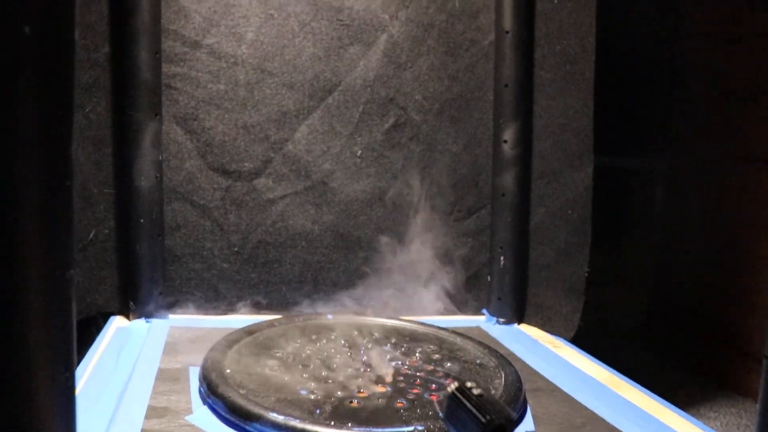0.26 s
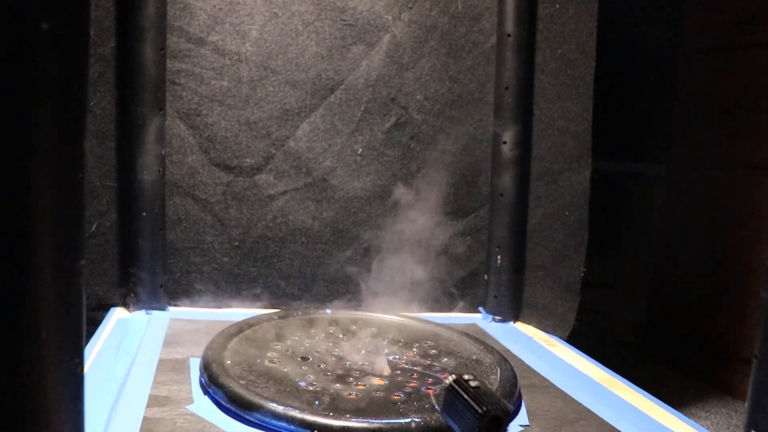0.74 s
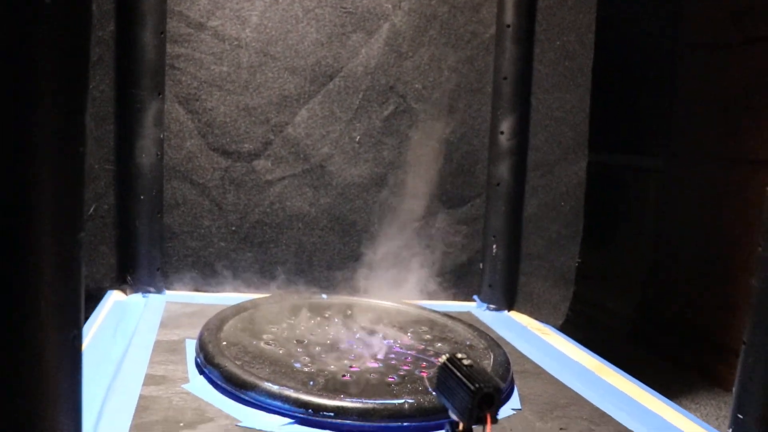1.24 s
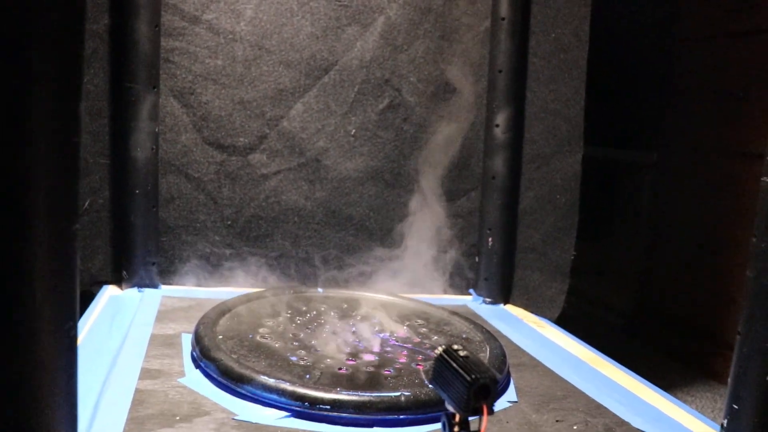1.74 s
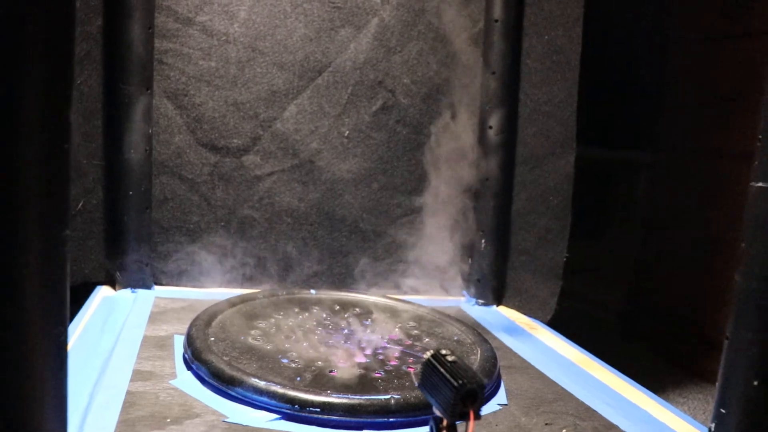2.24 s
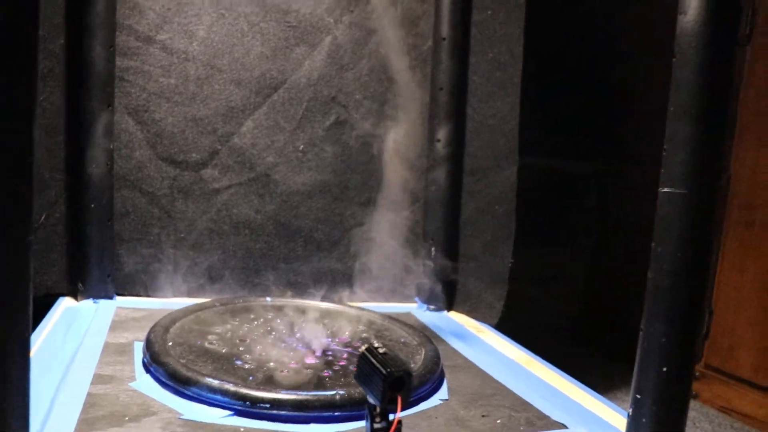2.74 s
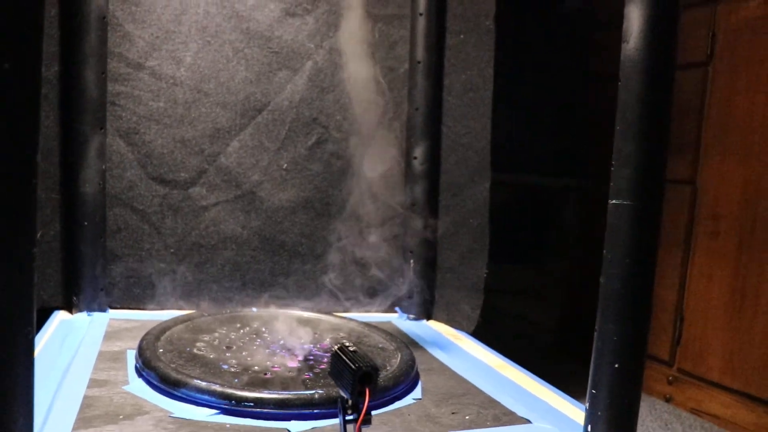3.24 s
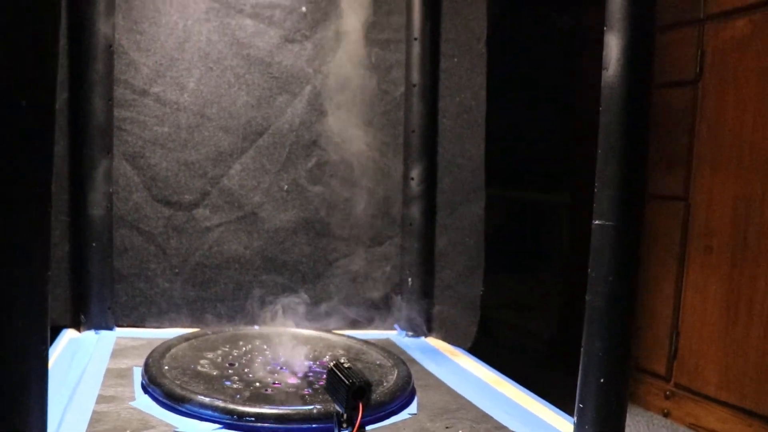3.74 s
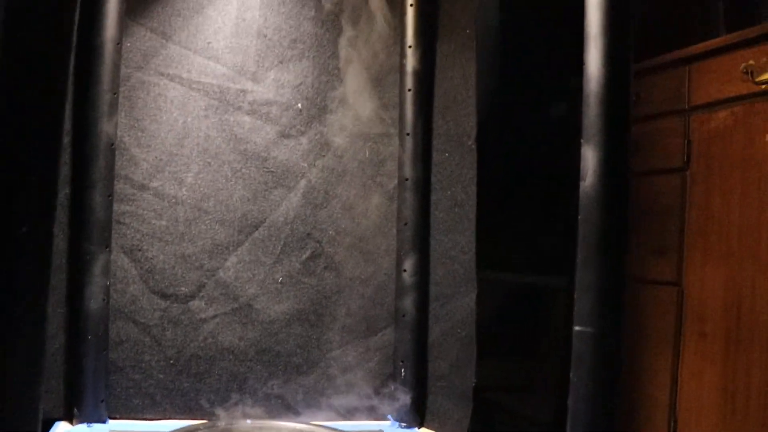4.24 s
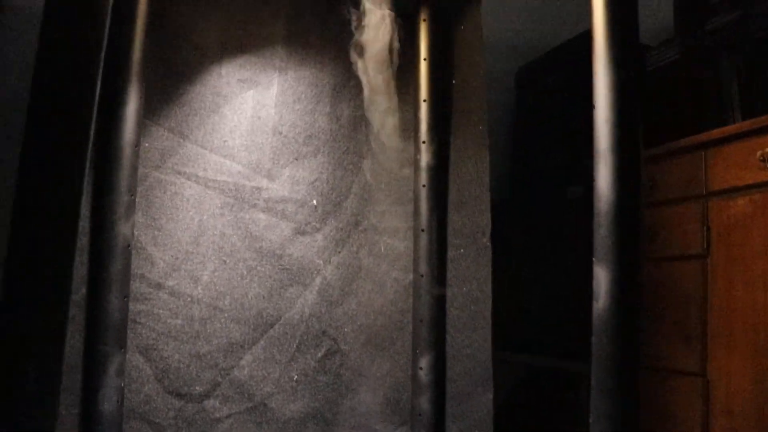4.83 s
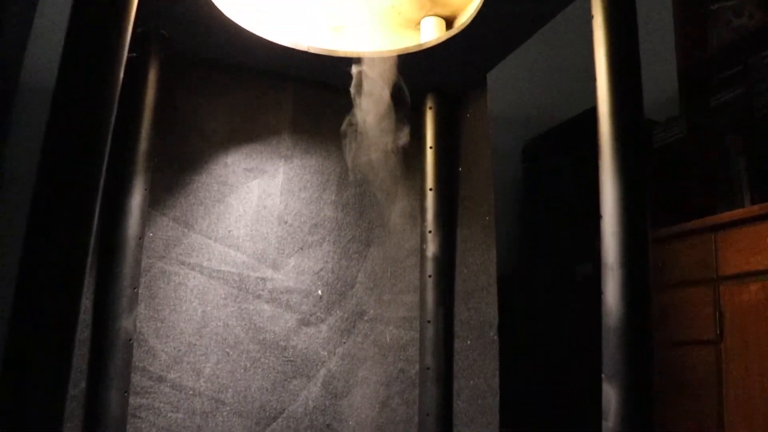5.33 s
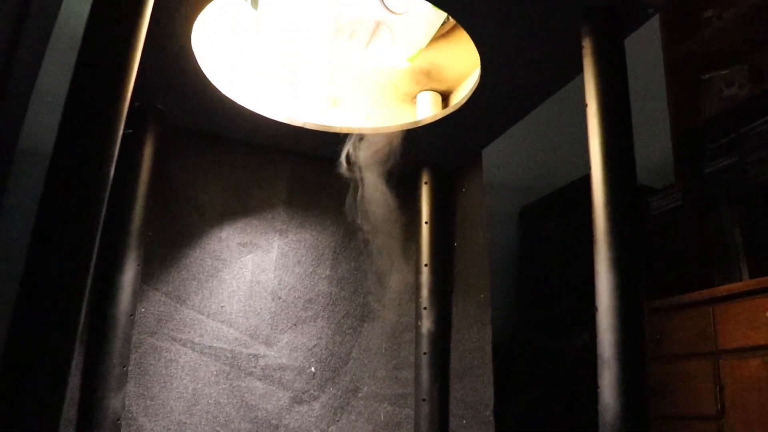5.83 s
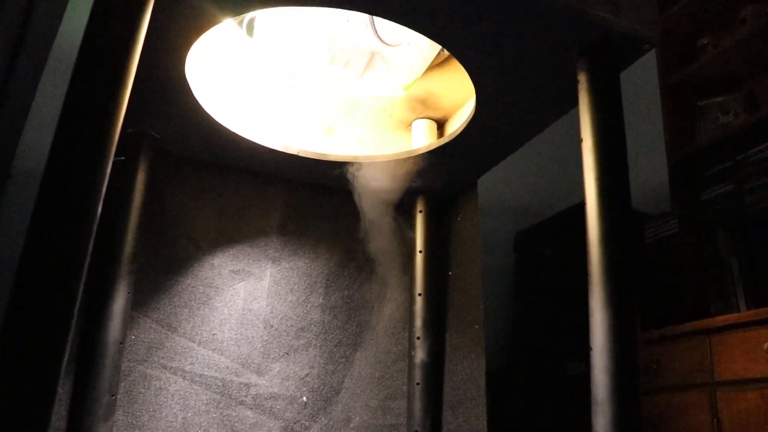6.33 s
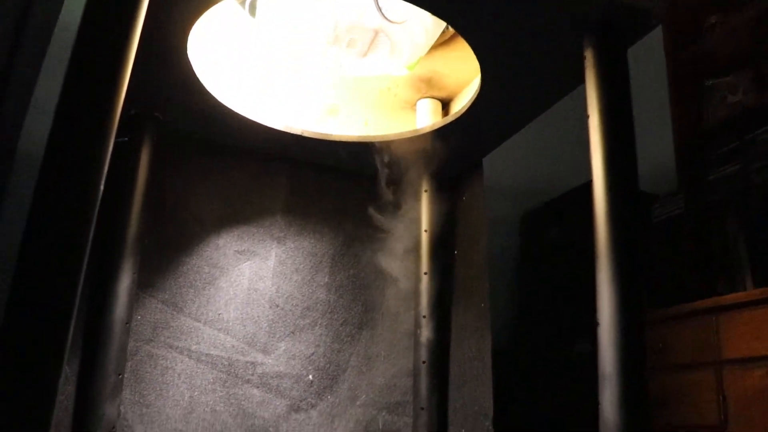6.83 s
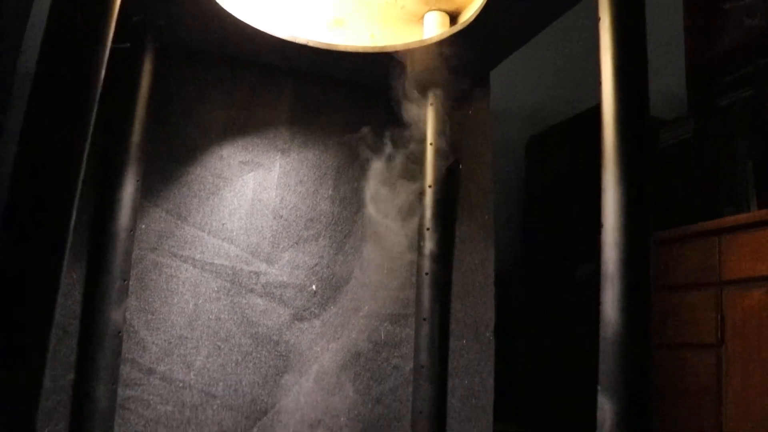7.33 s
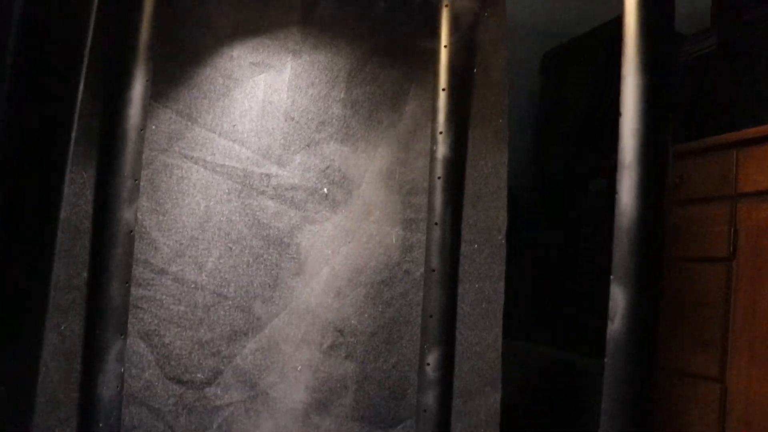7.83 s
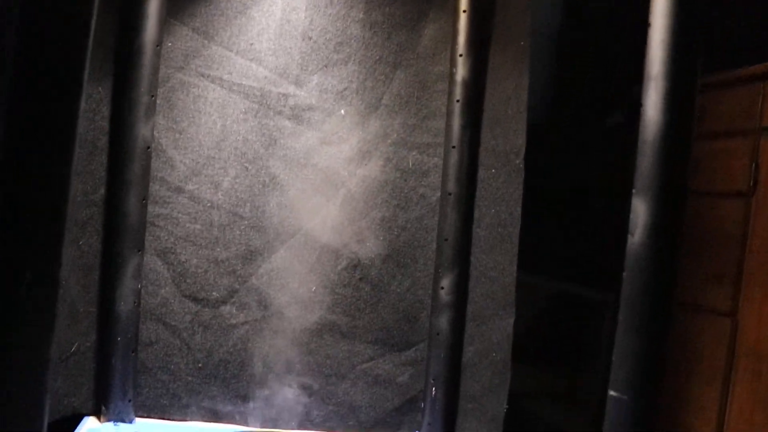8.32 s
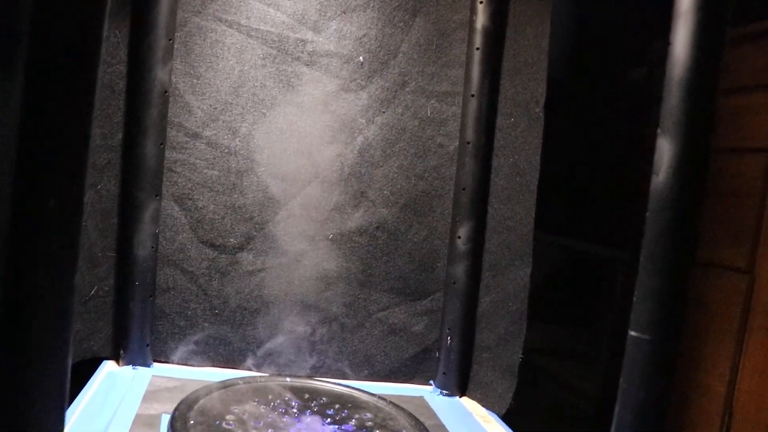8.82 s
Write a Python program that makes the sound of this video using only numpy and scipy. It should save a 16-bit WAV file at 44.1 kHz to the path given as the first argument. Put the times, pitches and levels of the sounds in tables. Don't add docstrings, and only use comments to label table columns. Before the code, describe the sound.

Rushing duct air and motor whine end with a hard plastic click, leaving sparse wet plops, fine spatter and low hum in a small booth.

```python
import sys
import numpy as np
from scipy import signal
from scipy.fft import rfft, irfft
from scipy.io import wavfile
from scipy.ndimage import map_coordinates

SR = 44100
rng = np.random.default_rng(int(sys.argv[2]) if len(sys.argv) > 2 else 0)


def amplitude_ratio(level_db):
    exponent = np.asarray(level_db, float) / 20
    return 10 ** exponent


def generate_wav(signal):
    frames = np.transpose(np.atleast_2d(signal))
    scaled = np.clip(frames, -1, 1) * 32767
    pcm = np.round(scaled).astype(np.int16)
    wavfile.write(sys.argv[1], SR, pcm)


N = 399987
TIME_S = np.arange(N) / SR
BINS_HZ = np.maximum(np.fft.rfftfreq(N, 1 / SR), 1)
SWITCH_OFF_S = 1.95
BASIN_HZ, BASIN_WIDTH_HZ = 597, 20

# start_s, level_db
ROTOR = [
    (0, -31),
    (.12, -30),
    (1.97, -30),
    (2.55, -36),
    (3.4, -42.5),
    (4.3, -48.5),
    (5.2, -55.5),
    (9.07, -56),
]
# start_s, share_0_to_1
AWAY = [
    (0, 0.1),
    (1.0, 0.04),
    (4.0, 0.23),
    (4.45, 0.3),
    (4.9, 0.97),
    (7.5, 0.58),
    (8.5, 0.2),
    (9.07, 0.1),
]


def rms_one(x):
    return x / np.sqrt(np.mean(x ** 2) + 1e-20)


def in_time(rows):
    s, *columns = np.transpose(rows)
    return [np.interp(TIME_S, s, c) for c in columns]


def at_hz(points, hz):
    return np.interp(np.log(hz), np.log(np.array(points)[:, 0]), np.array(points)[:, 1])


def drift(per_s):
    knots = rng.standard_normal(400)
    return map_coordinates(knots, [TIME_S * np.clip(per_s, .1, 40)], order=3)


def colored_noise(spectrum, modes=()):
    level_db = at_hz(spectrum, BINS_HZ)
    for hz, width, boost_db in modes:
        level_db = level_db + boost_db / (1 + (2 * (BINS_HZ - hz) / width) ** 2)
    return rms_one(irfft(rfft(rng.standard_normal(N)) * amplitude_ratio(level_db), N))


def tone(hz, level_db, waver_db):
    level = np.sqrt(2) * amplitude_ratio(level_db + waver_db * drift(2.34))
    return level * np.sin(2 * np.pi * (hz * TIME_S + rng.random()))


def add(out, s, sound):
    i = min(round(s * SR), N)
    out[i:i + len(sound)] += sound[:N - i]


def resonance(x, hz, width):
    r = np.exp(-np.pi * width / SR)
    feedback = [1, -2 * r * np.cos(2 * np.pi * hz / SR), r * r]
    return signal.lfilter(np.array([1, 0, -1]) * (1 - r * r) / 2, feedback, x)


def double_resonance(x, hz, width):
    return resonance(resonance(x, hz, width), hz, 2 * width)


def splat(noise, t, hz, spread, lasts):
    burst = double_resonance(noise * np.exp(-t / lasts), hz, spread * hz)
    return burst / np.abs(burst).max()


def rotor_change_db():
    air_db, = in_time(ROTOR)
    return air_db - ROTOR[0][1]


def coasting_s():
    return np.maximum(TIME_S - SWITCH_OFF_S, 0)


def fan(patchy_db):
    # pitch_hz, level_db (per Hz)
    fan_air = [(35, -28), (60, -6.5), (101, -18.5), (148, -10.5), (266, -4), (335, 1.5), (542, -8),
               (602, -7.5), (825, -9.5), (1110, -14), (2300, -20), (2560, -17), (3430, -18), (7000, -39.5),
               (9000, -45.5), (11700, -49), (19800, -120)]
    # pitch_hz, width_hz, boost_db
    duct = [(76, 37, -6.5), (240.5, 41, 4), (281, 52, 5), (346, 28, -9), (429, 30, 4), (577, 75, -3.5),
            (624, 74, 2), (846, 24, -8.5), (918, 58, -1), (971, 42, 4.5), (3570, 930, 2.5), (5680, 1240, 5)]
    # pitch_hz, loss_db (per dB of rotor level)
    fade_rate = [(100, 0.05), (250, 1.2), (350, 1.07), (500, 1.02), (1000, 1.35), (3000, 1.5), (7000, 2)]
    change_db = rotor_change_db()
    bins, out = rfft(colored_noise(fan_air, duct)), 0
    for hz in 62.5 * 2 ** np.arange(0, 8, .5):
        band = np.cos(np.pi / 2 * np.clip(2 * np.log2(BINS_HZ / hz), -1, 1)) ** 2
        gain_db = 0.5 + ROTOR[0][1] + at_hz(fade_rate, hz) * change_db + patchy_db * drift(7.0)
        out = out + amplitude_ratio(gain_db) * irfft(bins * band, N)
    return out


def pipe():
    change_db = rotor_change_db()
    damping_db = -7.5 * np.exp(-coasting_s() / .3)
    stall_db = 2 * np.minimum(change_db + 23, 0)
    sung = double_resonance(rng.standard_normal(N), 251, 11)
    return amplitude_ratio(-35 + damping_db + stall_db + .9 * change_db) * rms_one(sung)


def motor():
    motor_hz = [340.9, 600.3, 828.2, 948.2, 1200.5]
    motor_db = [-39, -49, -46.5, -50.5, -60]
    current = np.exp(-coasting_s() / 0.043)
    return current * sum(tone(hz, db, waver_db=.6) for hz, db in zip(motor_hz, motor_db))


def blades():
    coast = coasting_s()
    turns = np.cumsum(97.2 * np.exp(-.42 * coast)) / SR
    return np.sqrt(2) * amplitude_ratio(-48 - 9 * coast) * np.sin(2 * np.pi * turns)


def cogging():
    cog_teeth = [6, 7, 8]
    # pitch_hz, width_hz, level_db (rms on top)
    housing = [(735, 110, -60), (935, 100, -59)]
    coast = coasting_s()
    turns = np.cumsum(174 * np.exp(-.31 * coast)) / SR
    lines = sum(amplitude_ratio(4.1 * drift(9)) * np.sin(2 * np.pi * k * turns) for k in cog_teeth)
    lines = np.sqrt(2) * amplitude_ratio(-2.2 * coast) * lines
    return sum(amplitude_ratio(db) * double_resonance(lines, hz, width) for hz, width, db in housing)


def hum():
    mains_odd_db = [-50.5, -62, -63.5, -68, -71, -73, -74, -75, -77, -78, -77]
    appliance_multiples = [1, 3, 7]
    appliance_db = [-52, -53.5, -66]
    mains_hz, appliance_hz = 60.02, 39.53
    throb_period_s, throb_top_s = 2.62, 2.8
    throb = amplitude_ratio(3.8 * np.cos(2 * np.pi * (TIME_S - throb_top_s) / throb_period_s))
    lowest, *upper = [tone((2 * k + 1) * mains_hz, db, waver_db=.7) for k, db in enumerate(mains_odd_db)]
    appliance = sum(tone(k * appliance_hz, db, waver_db=.9)
                    for k, db in zip(appliance_multiples, appliance_db))
    return throb * lowest + sum(upper) + appliance


def murmur():
    # pitch_hz, level_db (per Hz)
    rumble = [(16, -42), (28, 4.5), (48, -9.5), (124, -8.5), (221, -10.5), (293, -11), (354, -11.5),
              (427, -11.5), (478, -11.5), (588, -6.5), (723, -15), (840, -24), (2500, -29.5), (3250, -67),
              (5500, -120)]
    # pitch_hz, width_hz, boost_db
    room_modes = [(58, 7.8, -8), (121, 30, 4.5), (430, 37, 6.5), (550, 43, 1.5), (720, 51, 6.5),
                  (262, 18, -16)]
    return amplitude_ratio(-49.5 + .6 * drift(8)) * colored_noise(rumble, room_modes)


def hiss():
    # pitch_hz, level_db (per Hz)
    hiss_color = [(530, -34), (900, -1.5), (1440, -9), (3620, -7.5), (4490, -11.5), (5240, -9),
                  (6990, -12.5), (15100, -15), (15800, -15.5)]
    return amplitude_ratio(-53 + 0.15 * rotor_change_db()) * colored_noise(hiss_color)


def port_hiss():
    color = [(100, 5.5), (600, 1), (2000, -2.5), (3500, -2.5), (6000, 0.5), (14000, -1.0)]
    return amplitude_ratio(-71.5) * colored_noise(color)


def spray():
    # pitch_hz, width_hz, boost_db
    spray_modes = [(9430, 400, 10), (11340, 600, 9), (12400, 300, 5)]
    away, = in_time(AWAY)
    mist = colored_noise([(6000, -40), (9000, -5), (13000, -1), (16000, -38)], spray_modes)
    return amplitude_ratio(-63.5 - 18.5 * away) * mist


def fizz(per_s, level_db):
    strength = amplitude_ratio(3.3 * np.minimum(rng.exponential(1, N), 1.6))
    bursts = strength * rng.choice([-1, 1], N) * (rng.random(N) < per_s / SR)
    dealt = rng.integers(0, 14, N)
    pitches = np.geomspace(1500, 6000, 14)
    return amplitude_ratio(level_db) * sum(hz ** -.5 * resonance(bursts * (dealt == k) + 1e-18, hz, 0.055 * hz)
                               for k, hz in enumerate(pitches))


def gulps():
    # start_s, peak_db
    air_gulps = [(3.999, -39), (4.305, -40), (5.097, -37), (5.398, -39), (5.488, -37), (5.585, -36),
                 (5.748, -46), (6.04, -48), (6.361, -38), (6.565, -34), (6.715, -35.5), (7.014, -33),
                 (7.069, -50), (7.556, -32), (7.794, -34), (8.154, -34), (8.288, -33), (8.445, -32),
                 (8.594, -38), (8.763, -49)]
    away, = in_time(AWAY)
    note = double_resonance(rng.standard_normal(N), BASIN_HZ, BASIN_WIDTH_HZ)
    out, t = amplitude_ratio(-65 + 12.5 * away) * rms_one(note), np.arange(3000) / SR
    for s, peak_db in air_gulps:
        push = rng.standard_normal(len(t)) * np.exp(-t / 0.005)
        boom = resonance(resonance(push, BASIN_HZ, 160), BASIN_HZ, BASIN_WIDTH_HZ)
        add(out, s, amplitude_ratio(peak_db - 8.5) * boom / np.abs(boom).max())
    return out


def hand_wobble():
    # pitch_hz, level_db (per Hz)
    shaking = [(3, -45), (7, -20), (12, 0), (17, -6), (24, -21), (34, -40)]
    # start_s, peak_db
    hand_jolts = [
        (.3, -39),
        (.6, -40.5),
        (2.53, -34.5),
        (2.9, -35),
        (4.32, -42.5),
        (5.9, -36),
        (6.58, -40.5),
        (7.48, -43),
    ]
    rise_db_per_s, fall_db_per_s, still_db = 54, 23.5, -49
    jolts = [db - np.maximum(rise_db_per_s * (s - TIME_S), fall_db_per_s * (TIME_S - s))
             for s, db in hand_jolts]
    level_db = np.maximum(np.max(jolts, axis=0), still_db)
    return amplitude_ratio(level_db) * colored_noise(shaking + [(60, -87.0)])


def lid(uneven_db, splat_db):
    # start_s, peak_db, brightness_db_per_octave
    taps = [(.3478, -49, 18), (0.736, -30.5, -5.5), (1.286, -35.5, -30), (1.8291, -37, -30),
            (2.4681, -42, -20), (2.7282, -27.5, -15), (2.742, -40, 3), (3.8873, -46, -25),
            (4.1032, -42.5, 12), (4.2474, -42, 0), (4.3232, -31, -24), (4.7643, -43, -30),
            (5.809, -48, -25), (8.0552, -41, -20), (8.4445, -42, 5), (8.5176, -42.5, -20)]
    # pitch_hz, level_db, t60_s
    lid_modes = [(7500, -18, .008), (9440, 1, 0.0071), (10600, -4, 0.0067), (11300, -4, .009),
                 (12500, -7, 0.009), (13100, -7, .01)]
    main_hz = lid_modes[1][0]
    out, t = np.zeros(N), np.arange(900) / SR
    for s, peak_db, tilt_db in taps:
        noise, ring = rng.standard_normal(len(t)), 0
        for k, (hz, db, t60) in enumerate(lid_modes):
            bright_db = tilt_db * max(np.log2(hz / main_hz), 0)
            level = amplitude_ratio(db + bright_db + uneven_db * noise[k] - 60 * t / t60)
            ring = ring + level * np.sin(2 * np.pi * hz * t + noise[-1 - k])
        wet = amplitude_ratio(splat_db) * splat(noise, t, 10000, spread=0.58, lasts=0.0037)
        snap = amplitude_ratio(-5) * splat(noise[::-1], t, 9000, spread=1.2, lasts=0.0003)
        add(out, s, amplitude_ratio(peak_db - 1.5) * ((1 - np.exp(-t / 0.0001)) * ring + wet + snap))
    return out


def drips(rise, splat_db, partner_db):
    # start_s, peak_db, pitch_hz
    specks = [(.3497, -34, 6500), (.9245, -35, 6550), (0.999, -31, 4470), (2.429, -38, 6680),
              (2.4693, -45, 7500), (2.559, -35, 4050), (2.8619, -39.5, 4070), (3.001, -36, 7700),
              (3.0793, -32.5, 4850), (3.1082, -40, 5940), (3.6717, -45, 4690), (3.8876, -45, 7110),
              (4.1662, -41, 5000), (4.3006, -45, 7900), (4.7656, -45, 7190), (4.801, -48, 4050),
              (6.2534, -45, 4870), (6.9274, -38, 4090), (7.4642, -46, 4140), (7.6, -44.5, 3700),
              (7.728, -41, 5990), (7.9446, -47, 3790), (7.9486, -43, 6770), (8.0729, -50, 4580),
              (8.2074, -44.5, 4480), (8.3456, -43, 7700), (8.5177, -44, 6240), (8.7294, -46, 3540),
              (9.018, -38.5, 6290), (9.0462, -45.5, 6270), (3.648, -43, 5750), (4.9059, -48, 5650),
              (5.0324, -49, 5900), (6.855, -52, 5500), (6.868, -48, 5500), (6.94, -47, 4000)]
    # start_s, peak_db
    nozzle = [(2.5433, -41), (2.6964, -37.5), (4.2472, -33), (5.1757, -34), (5.1913, -47), (5.2479, -43),
              (5.5961, -37), (5.6091, -37), (5.6232, -48), (6.738, -42), (6.7446, -43), (7.4232, -39),
              (7.735, -43), (8.072, -47), (8.508, -35), (9.0671, -40)]
    # start_s, peak_db, pitch_hz
    middling = [(2.993, -38, 3220), (3.1298, -38.5, 3820), (3.2301, -38.5, 2780), (3.421, -43, 3250),
                (3.4405, -42, 3880), (3.5341, -41.5, 3380), (3.66, -45, 3300), (3.893, -47, 2860),
                (4.117, -25.5, 3290), (4.1702, -43, 3060), (4.1856, -41.5, 2820), (4.3604, -37, 3390),
                (4.457, -39, 3540), (4.4715, -40, 2750), (5.2288, -43, 2820), (5.432, -30.5, 3090),
                (5.5702, -37.5, 3540), (5.605, -43, 2820), (5.8122, -32, 3350), (5.8221, -38, 2950),
                (5.9117, -46, 2740), (6.2405, -43, 3170), (6.2765, -42, 3720), (6.308, -40.5, 3080),
                (6.401, -49, 3360), (6.931, -43, 2780), (7.254, -27.5, 3530), (7.5112, -45, 3600),
                (8.2355, -41, 2970), (8.7728, -43, 3200), (8.836, -48, 2780), (8.771, -46, 3600),
                (6.603, -50, 2110)]
    # start_s, peak_db, pitch_hz
    plops = [(3.0052, -35, 2550), (3.6583, -37, 1640), (3.851, -36.5, 1700), (3.8937, -45, 1750),
             (4.2914, -47, 1900), (4.4159, -44.5, 2420), (4.9278, -44, 2100), (5.0796, -42.5, 2580),
             (5.1322, -49, 1640), (5.1616, -40, 1620), (5.2889, -50, 2440), (5.3798, -37.5, 2270),
             (5.6685, -38, 2330), (5.827, -40, 2470), (5.9589, -49, 1570), (6.3511, -42, 1580),
             (6.5682, -35.5, 2320), (6.5915, -42, 1990), (6.6579, -42, 2150), (6.672, -47, 2270),
             (7.0132, -38.5, 2420), (7.0548, -35.5, 2420), (7.2097, -41, 2500), (7.2255, -40, 2330),
             (7.5988, -44.5, 1695), (7.8595, -43.5, 2210), (7.9189, -49, 2370), (8.05, -49.5, 1870),
             (8.308, -39.5, 2040), (8.9526, -40, 2320)]
    fine_hz, big_hz = 4000, 3300
    ring_cycles, fine_cycles, shortest_t60_s = 54, 61, 0.0069
    rim_echo_s, rim_echo_db = .0052, -6.5
    out, t = np.zeros(N), np.arange(4000) / SR
    from_nozzle = [(s, db, 5300 * (1 + 0.014 * rng.standard_normal())) for s, db in nozzle]
    for s, peak_db, hz in from_nozzle + list(plops) + list(middling) + list(specks):
        noise = rng.standard_normal(len(t))
        deep = amplitude_ratio(.6 * max(peak_db + 37, 0)) if hz < fine_hz else fine_cycles / ring_cycles
        t60_s = max(min(deep, 1) * max(big_hz / hz, 1) * ring_cycles / hz, shortest_t60_s)
        swell = (1 - np.exp(-t * hz / 2.5 / deep)) ** max(deep, 1) * amplitude_ratio(-60 * t / t60_s)
        swell = swell / swell.max()
        turns = hz * (t + rise * t ** 2)
        partner = amplitude_ratio(partner_db) * np.sin(2 * np.pi * turns * (1 + 0.065 * noise[0]) + noise[1])
        bubble = swell * (np.sin(2 * np.pi * turns) + partner)
        impact = amplitude_ratio(splat_db) * splat(noise, t, hz, spread=0.89, lasts=0.00045)
        spatter = amplitude_ratio(-6) * splat(noise[::-1], t, hz, spread=0.27, lasts=0.007)
        add(out, s + rim_echo_s, amplitude_ratio(peak_db - 3.5 + rim_echo_db + 1.3 * noise[2]) * bubble)
        add(out, s, amplitude_ratio(peak_db - 2.5) * (bubble + (impact + spatter) / max(deep, 1)))
    return out


def ticks():
    # start_s, peak_db, pitch_hz (centre)
    spatter = [(.8325, -45, 11000), (3.387, -47.5, 11500), (3.7605, -47, 11000), (3.7665, -40, 3600),
               (4.2473, -44, 3140), (4.2788, -37.5, 2120), (4.5878, -49, 4950), (5.357, -50, 3090),
               (5.378, -44, 2400), (5.6002, -43, 3450), (5.6144, -51, 2700), (5.7389, -48, 3320),
               (5.8454, -47, 2820), (5.9317, -48, 3560), (6.255, -46, 4130), (6.9778, -44, 3450),
               (7.2254, -43, 3280), (7.3834, -53, 1880), (7.533, -45.5, 3860), (7.705, -53, 2400),
               (7.792, -47, 2420), (7.8744, -52, 1980), (8.2217, -46, 2650), (8.256, -49, 10200),
               (8.285, -41, 2600), (8.3756, -49, 6800), (8.845, -50, 4500), (6.925, -46, 2050),
               (8.71, -52.5, 1900), (8.5075, -46, 3060), (5.181, -48, 1600), (5.815, -48, 1300),
               (5.829, -48, 1400), (4.4365, -47, 2300), (2.7, -41, 1400), (8.29, -46, 1700),
               (4.775, -48, 7500), (3.659, -41, 2300), (6.742, -49, 1400), (9.05, -48, 5000)]
    out, t = np.zeros(N), np.arange(900) / SR
    for s, peak_db, hz in spatter:
        burst = splat(rng.standard_normal(len(t)), t, hz, spread=0.36, lasts=0.0039)
        add(out, s, amplitude_ratio(peak_db + 2.0) * burst)
    return out


def rattling_contacts(contacts, modes):
    out, t = np.zeros(N), np.arange(1500) / SR
    for s, peak_db, tilt_db, rattle_s in contacts:
        attack = 1 - np.exp(-t / 0.00032)
        burst = rng.standard_normal(len(t)) * attack * np.exp(-t / max(rattle_s, 1e-4))
        body = 0
        for k, (hz, width, db) in enumerate(modes):
            level = (-1) ** k * amplitude_ratio(db + tilt_db * np.log2(hz / 3000))
            body = body + level * resonance(burst, hz, width)
        add(out, s, amplitude_ratio(peak_db) * body / np.abs(body).max())
    return out


def switch_off():
    # start_s, peak_db, brightness_db_per_octave, rattle_s
    contacts = [
        (1.9148, -20.5, -2, 0.0036),
        (1.9212, -11, -0.5, .001),
        (1.9222, -9, -2.5, 0.00036),
        (1.924, -14, -8, 0.0011),
        (1.927, -18, -3, 0.0022),
        (1.9492, -13, 5, .0006),
        (1.9499, -2.5, 1.5, 0.00065),
        (1.9508, -2.5, -2, .0007),
        (1.9528, -12.5, -7, 0.0029),
        (1.978, -33, 9, 0.0072),
    ]
    # pitch_hz, width_hz, level_db
    switch_body = [(630, 210, -16.5), (1330, 330, -8.5), (1980, 450, -1.5), (2920, 260, 1), (3820, 350, -8),
                   (5500, 390, -4.5), (6240, 450, -4), (7200, 1300, -13.5), (8750, 1300, -16),
                   (12600, 5900, -26)]
    return rattling_contacts(contacts, switch_body)


def switch_release():
    # start_s, peak_db, brightness_db_per_octave, rattle_s
    contacts = [
        (2.1898, -18, -2, .0012),
        (2.1925, -17.5, -2, 0.0011),
        (2.195, -22.5, -4, 0.0013),
    ]
    # pitch_hz, width_hz, level_db
    rocker = [(700, 370, -7), (1900, 1100, -6), (3200, 500, 3.5), (4500, 900, -4.5), (5900, 700, -7),
              (8500, 2500, -19), (13000, 3000, -20)]
    return rattling_contacts(contacts, rocker)


def snaps():
    # start_s, peak_db
    skins = [(2.4405, -44), (2.7275, -40), (3.079, -40), (3.2295, -43), (3.534, -44), (3.6585, -42),
             (4.247, -42), (4.4565, -44), (4.729, -46), (4.8, -49), (5.3778, -45), (5.811, -43.5),
             (5.8215, -43), (6.657, -46), (6.737, -46), (7.5995, -46), (7.79, -43), (7.9445, -46),
             (8.0715, -47), (8.2855, -44), (8.4445, -42), (8.4745, -45), (8.5075, -45), (8.77, -47),
             (8.7995, -50)]
    out, t = np.zeros(N), np.arange(600) / SR
    for s, peak_db in skins:
        add(out, s, amplitude_ratio(peak_db) * splat(rng.standard_normal(len(t)), t, 3000, spread=1.0, lasts=0.0013))
    return out


def booth(x, wet_db):
    t = np.arange(9000) / SR
    hits = rng.standard_normal(len(t)) * (rng.random(len(t)) < .06) * (t > .003)
    echoes = signal.lfilter([1], [1, -.35], hits * amplitude_ratio(-60 * t / .13))
    return x + amplitude_ratio(wet_db) * signal.fftconvolve(x, echoes / np.linalg.norm(echoes))[:N]


def scene():
    machine = fan(patchy_db=1.0) + pipe() + motor() + blades() + cogging()
    background = hum() + murmur() + hiss() + spray() + hand_wobble()
    water = fizz(per_s=70, level_db=10) + gulps() + lid(uneven_db=0.8, splat_db=-10.5)
    water = water + drips(rise=1.23, splat_db=-4, partner_db=-12) + ticks() + snaps()
    switch = booth(switch_off() + switch_release(), wet_db=-21)
    mid = machine + background + switch + booth(water, wet_db=-16)
    side = port_hiss()
    return np.array([mid + side, mid - side])


def band_limit(x):
    return signal.sosfilt(signal.butter(12, 16650, fs=SR, output="sos"), x)


def record(dry):
    top_cut = signal.cheby2(12, 60, 16550, fs=SR, output="sos")
    mix = signal.sosfilt(top_cut, dry)
    return band_limit(mix)


dry = scene()
out = record(dry)
generate_wav(out)
```